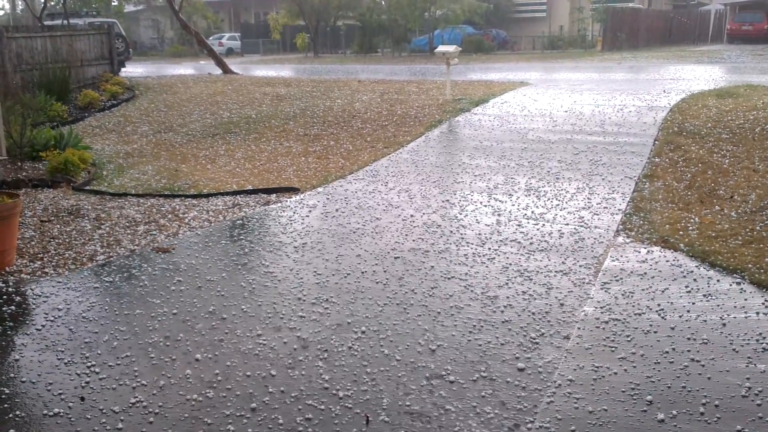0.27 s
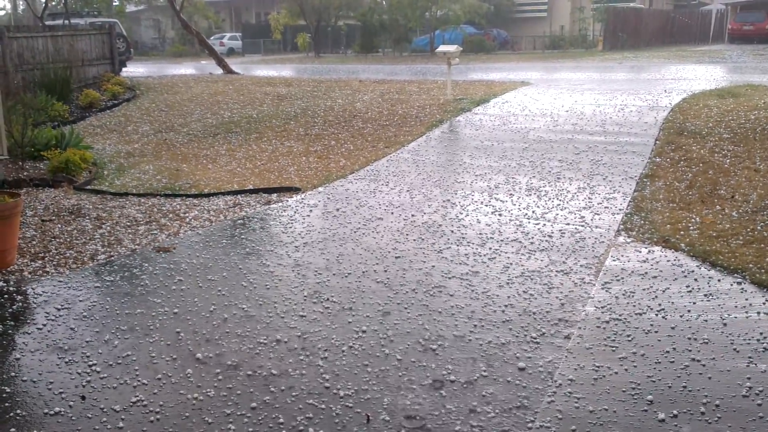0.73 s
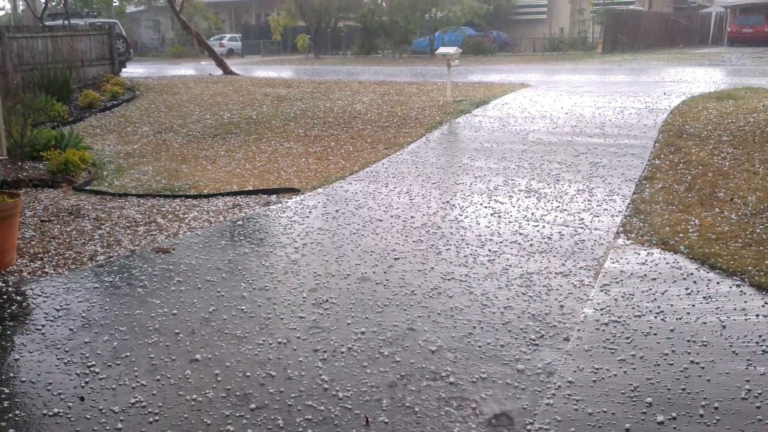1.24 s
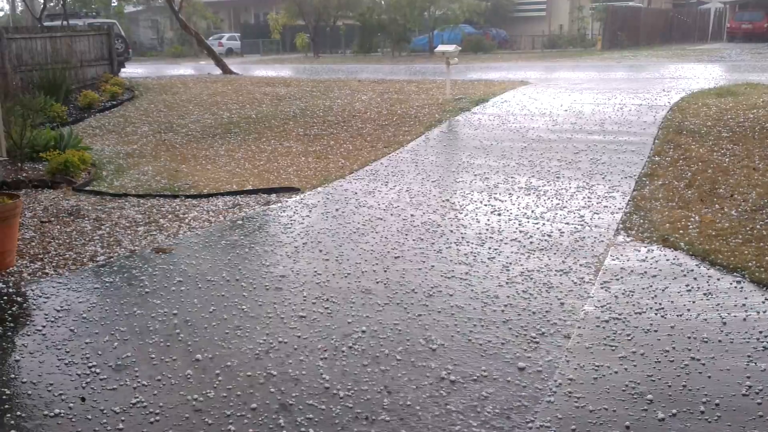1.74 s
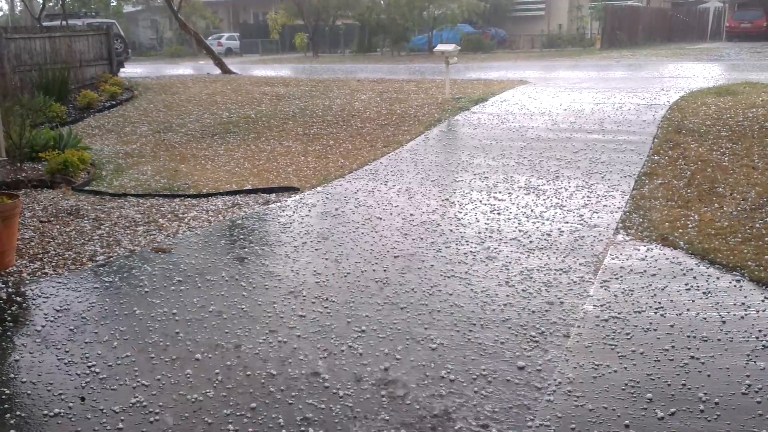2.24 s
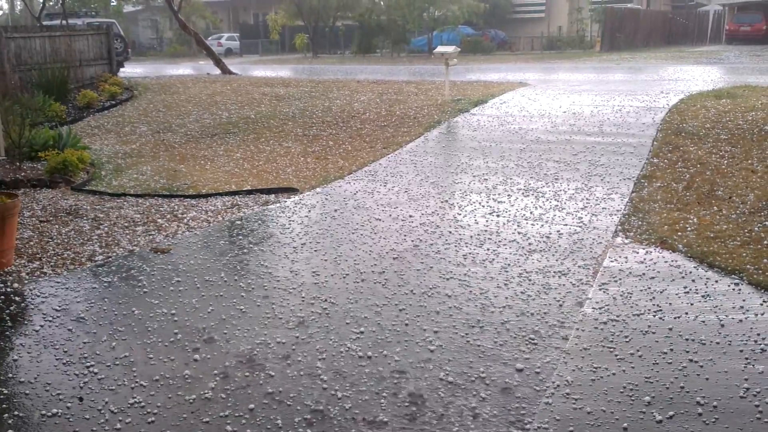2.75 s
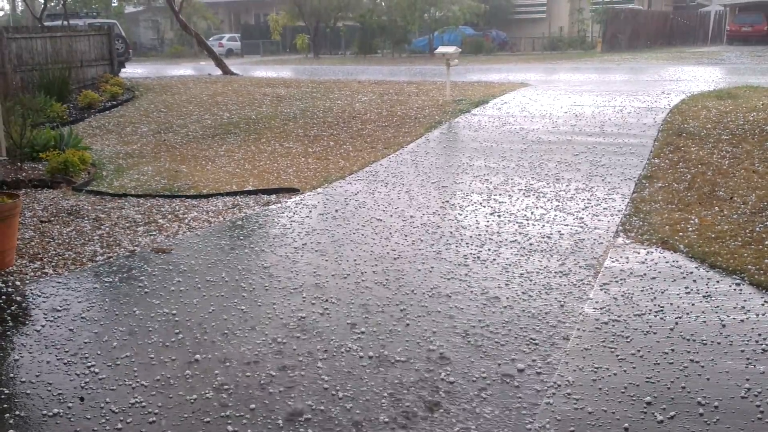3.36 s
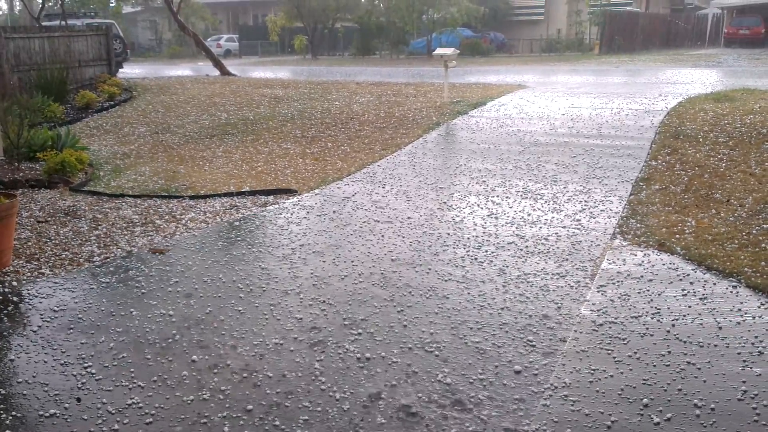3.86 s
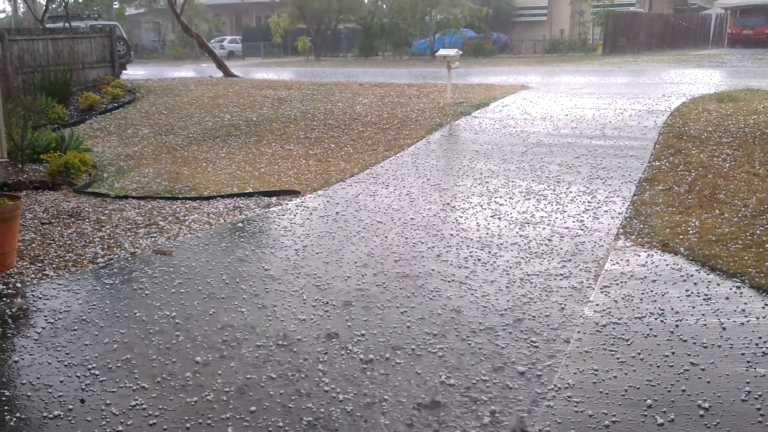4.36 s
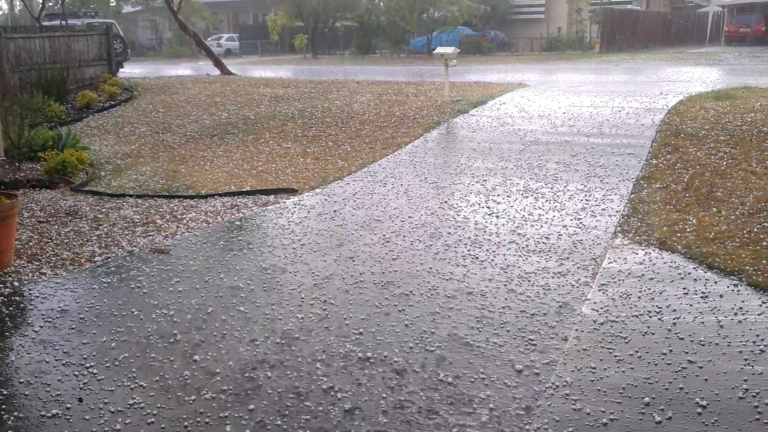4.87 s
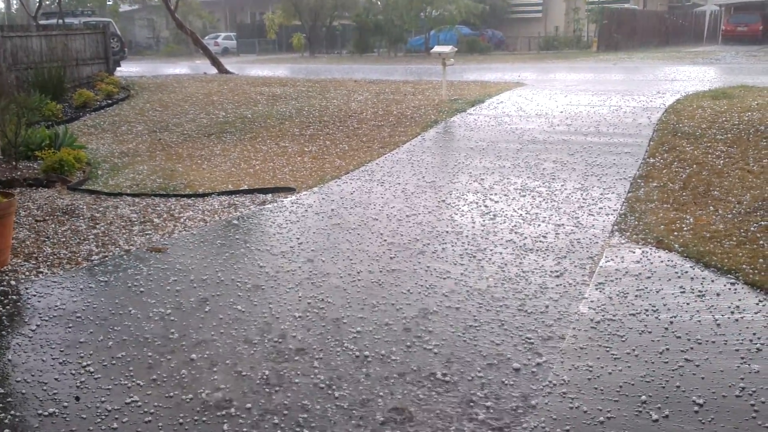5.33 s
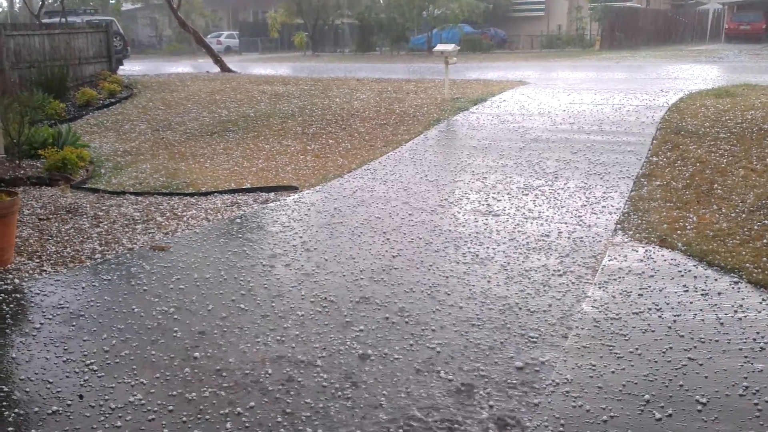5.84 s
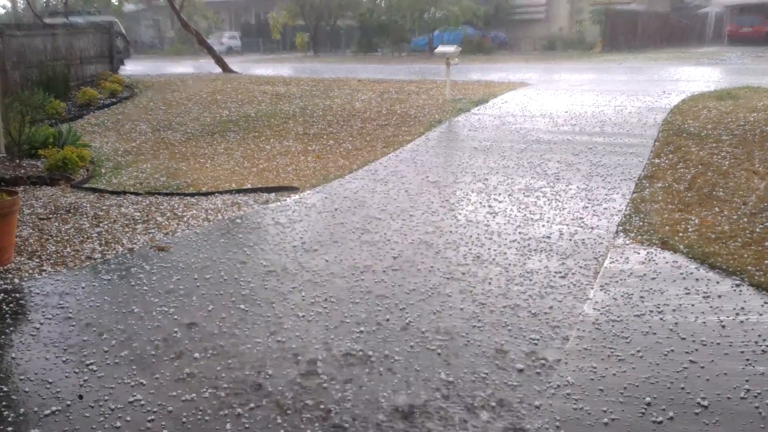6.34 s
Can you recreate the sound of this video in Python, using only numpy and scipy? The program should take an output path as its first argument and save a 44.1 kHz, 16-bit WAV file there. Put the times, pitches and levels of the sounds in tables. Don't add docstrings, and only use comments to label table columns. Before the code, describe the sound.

Under an eave, heavy rain and hail fall without pause on a wet concrete driveway. Roof runoff splatters in uneven, rapid clumps with tiny bubbly plinks, hailstones give short bright cracks, and a few heavy drops thud softly. Gusts sway the near patter over a steady distant hiss. Close, wide stereo phone pickup, thin in the bass.

```python
import sys
import numpy as np
from scipy import signal
from scipy.fft import rfft, irfft, next_fast_len
from scipy.io import wavfile
from scipy.ndimage import uniform_filter1d, map_coordinates

SR = 44100
rng = np.random.default_rng(int(sys.argv[2]) if len(sys.argv) > 2 else 0)


def volts(x):
    e = np.asarray(x, float) / 20
    return 10 ** e


def master(y):
    cut = np.clip(np.atleast_2d(y).T, -1, 1)
    pcm = np.round(cut * 32767)
    wavfile.write(sys.argv[1], SR, pcm.astype(np.int16))


N = 291043


def unit(x):
    return x / np.sqrt(np.mean(x ** 2) + 1e-20)


def along(points, hz):
    point_hz, value = np.transpose(points)
    return np.interp(np.log(hz + 1), np.log(point_hz + 1), value)


def wobble(knots_per_s):
    knots = rng.standard_normal(int(N * knots_per_s / SR) + 4)
    return map_coordinates(knots, [np.arange(N) * knots_per_s / SR])


def filtered(x, response):
    size = next_fast_len(N + 8192)
    spectrum = rfft(x, size) * response(np.fft.rfftfreq(size, 1 / SR))
    return irfft(spectrum, size)[..., :N]


def low_high(x, corner_hz):
    low = filtered(x, lambda hz: 1 / (1 + (hz / corner_hz) ** 2))
    return low, x - low


def runoff():
    power = np.zeros((2, 2, N))
    for middle_s, db, length_s, bright_db, pan_db in clumps():
        first = max(0, round((middle_s - .08) * SR))
        last = min(N, round((middle_s + .15) * SR))
        near = np.arange(first, last)
        u = (near / SR - middle_s) / max(length_s, .004)
        swell = np.exp(-np.where(u < 0, 3.2, 2.9) * u ** 2)
        part_db = bright_db * np.array([[-.5], [.5]])
        port_db = pan_db * np.array([[.7, -0.65]])
        gain = volts(db - 2.5 + part_db + port_db)
        power[:, :, near] += gain[..., None] ** 2 * swell
    spray = drops(patchy_db=2.0, grain_db=0.5, grains_per_s=610)
    bubbles = plinks(count=14000, centre_hz=3495, spread=0.715, cycles=4.84, size_db=3.5)
    water = unit(spray + volts(-9.5) * bubbles)
    dull, bright = low_high(water, 3060)
    return np.sqrt(power[0]) * dull + np.sqrt(power[1]) * bright


# middle in seconds, level in dB, length in seconds, brightness in dB.
GUSHES = [(0.041, -25.5, 0.058, 9), (.247, -23, 0.038, -9), (.549, -20, 0.063, 0), (0.852, -24.5, .045, 0),
          (0.918, -30, 0.051, 18), (1.098, -21, 0.034, -1), (1.33, -26, 0.034, -15.5),
          (1.451, -20, .051, 6.5), (1.551, -21, 0.07, 9.5), (1.681, -21.5, 0.037, 5.5),
          (1.823, -21.5, .037, 1), (2.272, -27.5, 0.042, 15.5), (2.49, -26.5, .037, -6),
          (2.825, -27, 0.043, 17), (2.954, -26, 0.024, -9), (3.473, -23.5, 0.059, 6),
          (3.578, -26.5, 0.046, 2), (3.862, -22, 0.087, 1.5), (4.348, -24, 0.022, 0), (4.55, -24, 0.038, 9),
          (4.721, -22.5, 0.038, 2), (4.806, -22.5, .039, -1.5), (4.986, -26.5, 0.048, 4),
          (5.083, -23.5, 0.047, -9), (5.464, -23.5, 0.066, -3), (5.584, -22, 0.052, 1),
          (5.758, -28, 0.037, -12.5), (5.935, -22, 0.06, -1.5), (6.138, -20.5, 0.036, 0),
          (6.405, -22.5, 0.066, 2)]
# middle in seconds, level in dB, brightness in dB.
SLAPS = [(.184, -25.5, 4), (.386, -21.5, -1), (.44, -24.5, -2), (.618, -24.5, 6), (.973, -27.5, -10),
         (1.735, -25, 2), (0.753, -27.5, -15), (2.116, -20.5, 1), (2.171, -25, 8), (2.391, -22.5, -9.5),
         (2.611, -25.5, -7), (2.763, -26.5, 0), (3.214, -21.5, 0), (3.257, -20.5, -2), (3.364, -27.5, -2),
         (3.513, -26.5, -1), (4.012, -22.5, -1), (4.113, -26, 5), (4.498, -24, 1), (4.628, -23.5, 0),
         (4.863, -24.5, 6), (5.171, -26, -2), (5.289, -22, -5), (5.363, -19.5, 2), (5.532, -24, 1),
         (5.819, -20.5, 3), (6.063, -24.5, 5), (6.308, -25, -4), (6.478, -25.5, 7), (6.527, -26, -4)]
# middle in seconds, level in dB.
SPITS = [(0.137, -25), (.333, -25.5), (.67, -32), (.707, -29), (.79, -28), (1.159, -27), (1.21, -35),
         (1.263, -24), (1.41, -26), (1.875, -26), (1.97, -28.5), (2.04, -30), (2.067, -22.5),
         (2.215, -29.5), (2.56, -31), (2.708, -27.5), (2.881, -27.5), (3.006, -30), (3.068, -24),
         (3.127, -27.5), (3.16, -28), (3.62, -29), (3.76, -29), (4.153, -21), (4.29, -31), (4.432, -28.5),
         (4.93, -30), (5.688, -21.5), (5.86, -30), (6.254, -28)]


def clumps():
    slap_s, slap_at_db, longer_per_db = 0.023, -24, 0.04
    spit_s, spit_bright_db = 0.02, 9.5
    lean_db, scatter_pan_db = 0.33, 1.94
    rows = list(GUSHES)
    for s, db, bright_db in SLAPS:
        length_s = slap_s * np.exp(longer_per_db * (db - slap_at_db))
        rows.append((s, db, length_s, bright_db))
    for s, db in SPITS:
        rows.append((s, db, spit_s, spit_bright_db))
    pan_db = lean_db + scatter_pan_db * rng.standard_normal(len(rows))
    return np.column_stack([np.array(rows), pan_db])


# frequency in Hz, likeness from -1 to 1.
LIKENESS = [(150, 0.22), (550, 0.79), (1000, 0.38), (1300, 0.21), (1600, -0.52), (2100, -0.13), (2800, .1),
            (5000, -0.0026)]


def drops(patchy_db, grain_db, grains_per_s):
    z = signal.stft(rng.standard_normal((2, N)), nperseg=256)[2]
    patches = uniform_filter1d(rng.standard_normal(z.shape[1:]), size=10, axis=0)
    patches = uniform_filter1d(patches, size=4, axis=1)
    pair = signal.istft(z * volts(patchy_db * unit(patches)), nperseg=256)[1][:, :N]
    pair = pair * volts(grain_db * wobble(grains_per_s))

    def mid_side(hz):
        turn = np.arccos(np.clip(along(LIKENESS, hz), -1, 1)) / 2
        return np.array([np.cos(turn), np.sin(turn)])

    mid, side = filtered(pair, mid_side)
    return unit(np.array([mid + side, mid - side]))


def plinks(count, centre_hz, spread, cycles, size_db):
    port_gap_m, sound_m_per_s = .14, 343
    draw, t = rng.random((count, 3)), np.arange(320) / SR
    hz = centre_hz * np.exp(spread * rng.standard_normal((count, 1)))
    life = hz * t / cycles
    swell = life * np.exp(-3 * life)
    tone = np.sin(2 * np.pi * hz * t * (1 + 0.087 * life)) * swell * np.sqrt(hz)
    tone *= volts(-size_db * np.log(1.01 - draw[:, :1]))
    start = draw[:, 1:2] * N
    lag = port_gap_m / sound_m_per_s * SR * np.cos(np.pi * draw[:, 2:]) / 2

    def place(at):
        index = at.astype(int) + 20 + np.arange(len(t))
        return np.bincount(index.ravel(), tone.ravel(), N + 400)[20:N + 20]

    return unit(np.array([place(start + lag), place(start - lag)]))


# start in seconds, level in dB over the spray at that pitch, centre in Hz, left-right in dB.
STONES = [(.1359, 14, 8960, 3), (.3282, 9, 11370, -3), (.7803, 11, 10500, 5), (.8713, 15, 11370, 2),
          (1.102, 11, 4480, -15), (1.2577, 11, 11000, 3), (1.3496, 15, 9300, 8), (1.4761, 22, 13780, 10),
          (1.4774, 21, 9650, -1), (1.544, 11, 8960, 6), (1.6253, 14, 11370, 5), (1.679, 11, 5860, 3),
          (1.8145, 15, 9990, 2), (1.8687, 14.5, 11710, 9), (2.0624, 17, 13780, -1), (2.394, 15, 11020, 3),
          (2.399, 9, 4480, 7), (3.0493, 16, 11370, -3), (3.2543, 16, 12000, 0), (3.3635, 12, 9500, 5),
          (3.5888, 14.5, 9650, 4), (4.1489, 15, 11000, 6), (4.158, 12, 7240, -3), (4.9287, 13, 8700, 6),
          (5.5313, 16, 9300, 6), (5.6532, 11, 12750, -4), (5.8117, 17, 10680, 5), (5.821, 18, 12400, 9),
          (5.9275, 22, 13090, 11), (6.07, 12, 8960, -11)]


def hail():
    crack_width_hz = 4500
    out, t = np.zeros((2, N + SR)), np.arange(1024) / SR
    f = np.fft.rfftfreq(len(t), 1 / SR)
    decay = volts(-60 * t / 0.0078) + 0.15 * volts(-60 * t / 0.047)
    shape = (1 - np.exp(-t / 0.00085)) * decay
    stones = [*STONES, *small_stones()]
    noise = rng.standard_normal((len(stones), 2, len(t)))
    for (s, db, hz, pan_db), hiss in zip(stones, noise):
        band = np.exp(-2 * ((f - hz) / crack_width_hz) ** 2)
        burst = irfft(rfft(hiss) * band)
        crack = shape * burst / np.sqrt(np.mean(burst ** 2) / np.mean(band ** 2))
        gain = volts(db - 20.5 + pan_db * np.array([[.5], [-.5]]))
        out[:, round(s * SR):][:, :len(t)] += gain * crack
    return out[:, :N]


def small_stones():
    stones_per_s, low_hz, top_hz = 12, 4300, 14500
    least_db, spread_db, lean_db, pan_db = 5, 1.8, 5.5, 7
    when, size, pitch, side = rng.random((round(stones_per_s * N / SR), 4)).T
    db = least_db - spread_db * np.log(1.01 - size)
    hz = low_hz + (top_hz - low_hz) * pitch
    return list(zip(when * N / SR, db, hz, lean_db + pan_db * (2 * side - 1)))


# start in seconds, peak in dB.
THUDS = [(0.067, -31), (0.251, -26), (1.321, -22), (1.449, -16), (1.51, -23), (1.665, -24), (2.473, -29),
         (3.063, -29), (3.412, -28), (5.529, -20.5), (6.142, -29), (6.389, -27)]


def thuds():
    out, t = np.zeros(N + SR), np.arange(SR // 20) / SR
    for (s, db), hz in zip(THUDS, rng.uniform(450, 670, len(THUDS))):
        envelope = volts(db - 5 - 60 * t / 0.046) * (1 - np.exp(-t / 0.0022))
        out[round(s * SR):][:len(t)] += envelope * np.sin(2 * np.pi * hz * t)
    return out[:N]


# time in seconds, level in dB, brightness in dB.
GUSTS = [(0, -27.5, -2), (1.0, -27, -1.5), (1.3, -25, 1.5), (1.6, -26, -8.5), (1.9, -28, -2),
         (2.3, -27, -3.5), (2.65, -29, -3), (3.3, -29.5, 2), (3.6, -26.5, -2), (3.75, -29.5, 1),
         (4.15, -24, -3), (4.4, -26, -2), (4.7, -26, -3), (5.3, -24.5, -3.5), (5.7, -29.5, 1.5),
         (6.01, -23.5, 0.5), (6.19, -27, -6), (6.6, -27, 2.5)]


def patter():
    gust_s, gust_db, gust_bright_db = np.transpose(GUSTS)
    t = np.arange(N) / SR
    level_db = np.interp(t, gust_s, gust_db) + 0.46 * wobble(8)
    bright_db = np.interp(t, gust_s, gust_bright_db) + 1.64 * wobble(11)
    dull, bright = low_high(drops(patchy_db=1.9, grain_db=0.8, grains_per_s=600), 2250)
    bubbles = plinks(count=6000, centre_hz=2190, spread=0.513, cycles=6.1, size_db=1.5)
    dull = dull + volts(-16.5) * bubbles
    bright = bright * volts(2.23 * wobble(45))
    return volts(level_db - 2.0) * (dull * volts(-bright_db / 2) + bright * volts(bright_db / 2))


# frequency in Hz, level in dB against the near spray.
STREET = [(300, -4), (1500, 3), (4000, -4), (9000, -27), (13000, 6.5)]


def street():
    hiss = drops(patchy_db=3.0, grain_db=2.6, grains_per_s=300)
    return volts(-36) * filtered(hiss, lambda hz: volts(along(STREET, hz)))


def scene():
    return runoff() + hail() + thuds() + patter() + street()


# frequency in Hz, level in dB per Hz.
LEFT_PORT = [(120, -56.5), (270, -31), (600, -9.5), (1100, -0.07), (1500, 0.9), (1900, -2), (2700, -2),
             (5600, -9.5), (6700, -8.5), (7800, -13.5), (9000, -10), (11000, -17), (12500, -27.5),
             (15600, -38)]
RIGHT_PORT = [(120, -75), (270, -31.5), (600, -18.5), (1200, -3.5), (1600, -3.0), (2200, -7), (2650, -3.5),
              (4100, -6), (5000, -5), (6800, -9), (8000, -18), (10000, -25), (12000, -31), (15600, -32.5)]


def ports(hz):
    top_hz, case_hz, case_width_hz, case_db = 15750, 2660, 120, 1
    gain = volts(np.array([along(LEFT_PORT, hz), along(RIGHT_PORT, hz)]))
    case = volts(case_db / (1 + (2 * (hz - case_hz) / case_width_hz) ** 2))
    gain = gain * (hz < top_hz) * case
    return 1.473 * gain / np.sqrt(np.mean(gain ** 2))


def widener(hz):
    echo_s, low_hz, top_hz = .002, 450, 14500
    highpass = 1j * hz / (low_hz + 1j * hz)
    band = highpass / (1 - (hz / top_hz) ** 2 + 1j * hz / top_hz)
    return .68 * (1 + .51 * band * np.exp(-2j * np.pi * hz * echo_s))


def low_rumble():
    noise = rng.standard_normal((2, N))
    low = filtered(noise, lambda hz: 1 / (1 + (hz / 120) ** 2))
    return volts(-65.5 + 4 * wobble(9)) * low


def top_cut(x):
    return signal.sosfilt(signal.butter(12, 15710, fs=SR, output="sos"), x)


def record(dry):
    left, right = filtered(dry, ports)
    mid = (left + right) / 2
    side = filtered((left - right) / 2, widener)
    mix = np.array([mid + side, mid - side]) + low_rumble()
    return top_cut(mix)


dry = scene()
out = record(dry)
master(out)
```